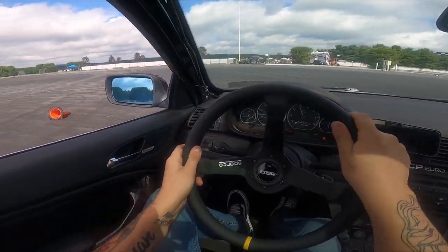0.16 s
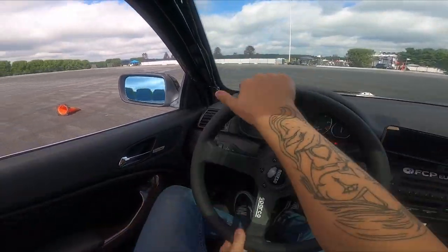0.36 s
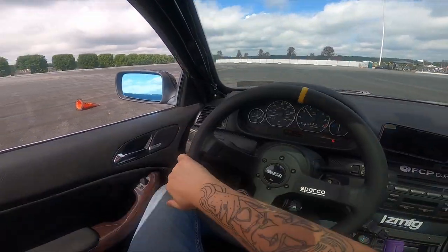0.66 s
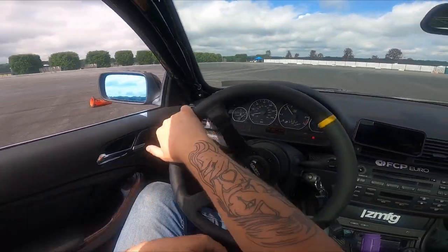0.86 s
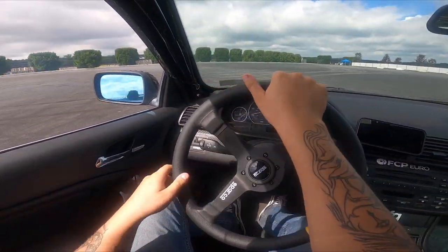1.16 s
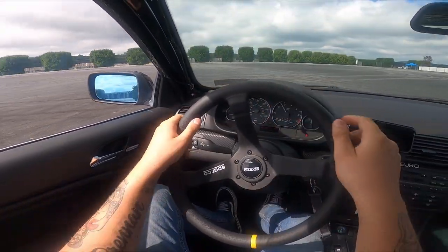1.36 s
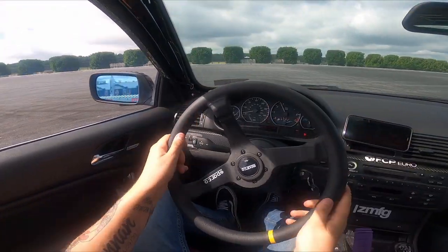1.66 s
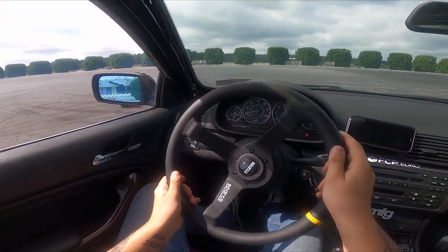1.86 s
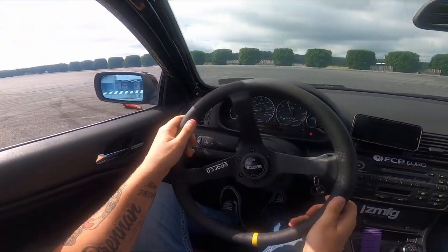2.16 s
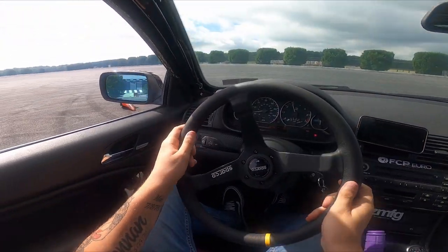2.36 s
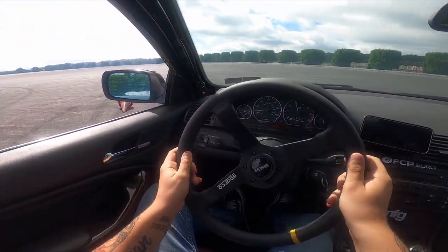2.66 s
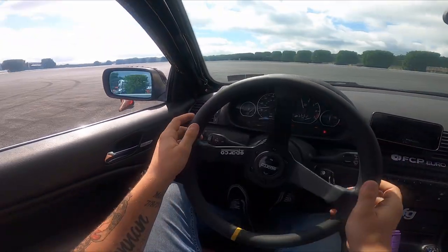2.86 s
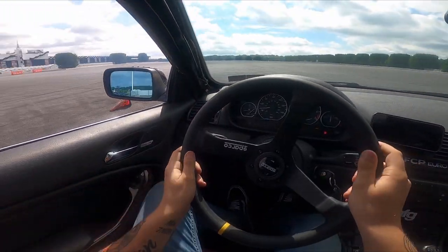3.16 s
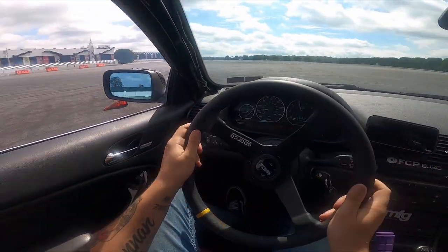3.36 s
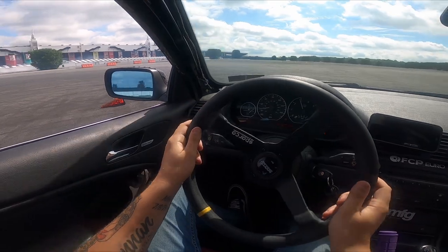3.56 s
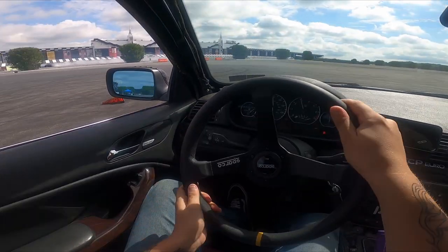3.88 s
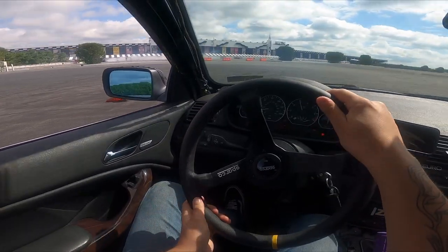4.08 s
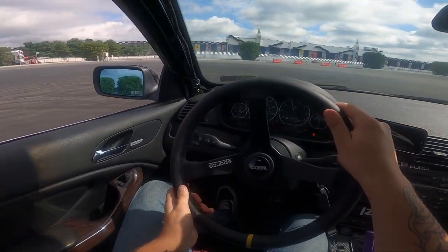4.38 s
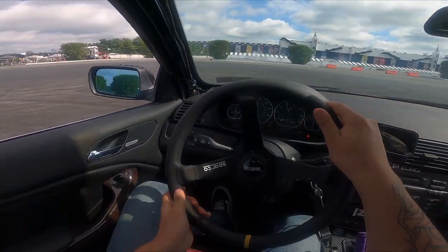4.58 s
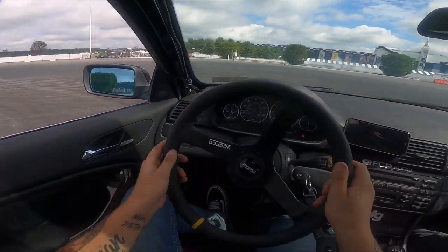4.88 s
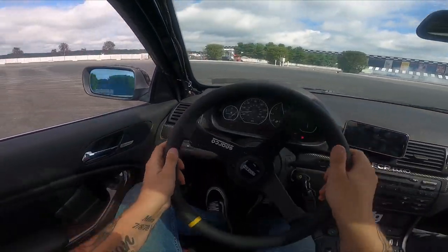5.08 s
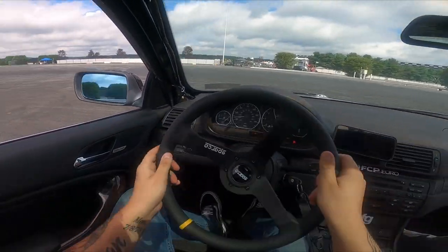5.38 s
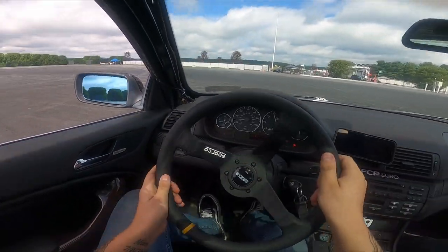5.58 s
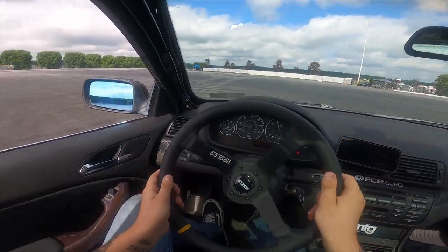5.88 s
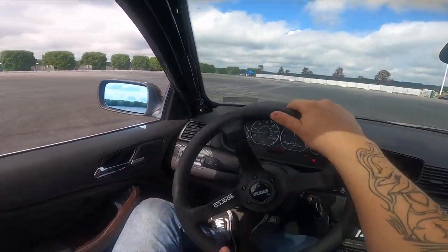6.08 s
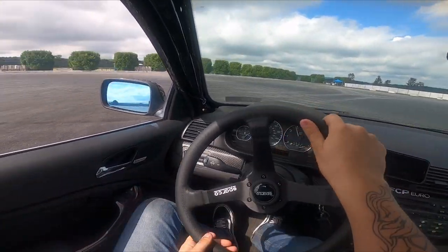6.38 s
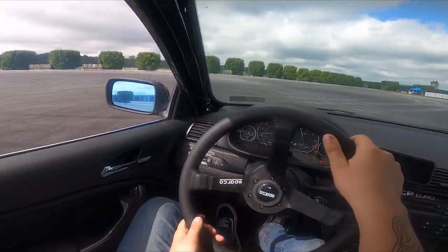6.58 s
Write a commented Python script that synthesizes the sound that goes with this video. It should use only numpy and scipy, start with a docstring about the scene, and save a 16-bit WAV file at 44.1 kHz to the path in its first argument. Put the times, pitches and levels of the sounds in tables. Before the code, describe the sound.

Inside a car drifting in tight circles on open tarmac, heard close at the driver's head. The engine is a deep, droning boom, already high at 0 s; it bogs sharply from 0.25 to 0.5 s, then climbs steadily to its peak near 3 s, drops briefly at 3.3 s, recovers by 4 s and wavers gently to the end at 6.7 s. Over it the tyres squeal without stopping, a warbling, grainy tone near 1.2 kHz with weak overtones and thin rubber hiss, sagging at 0.4 s and skipping momentarily near 0.6, 3.05, 3.9 and, most clearly, 5.9 s. Low body rumble rises around 0.6 s and again from 2.8 to 4.9 s. Wind buffets softly from 2.3 to 4 s, strongest at 3.25 s. Faint dry ticks are scattered throughout. The image is nearly mono, wider from about 0.7 to 3.7 s and slightly at the end; peaks are held down.

```python
"""The engine of a car drifting in tight circles on tarmac, heard from the driver's seat: it bogs
once, then booms at high revs, as harmonics of crank speed pass through the cabin's resonances.
The tyres squeal in stick-slip, as wandering tones rung by resonances, over a noise hiss of scrubbed
rubber. Banded noise makes the body's rumble and road sound, shaped noise the buffets of wind, and
impulses the faint ticks. A fast limiter holds down the peaks."""
import sys
import numpy as np
from scipy import signal
from scipy.fft import rfft, irfft
from scipy.io import wavfile
from scipy.ndimage import uniform_filter1d, minimum_filter1d

SR = 44100
rng = np.random.default_rng(int(sys.argv[2]) if len(sys.argv) > 2 else 0)


def store_wav(level_fs):
    """Save 16-bit WAV to argv[1]."""
    pcm = np.round(np.clip(np.atleast_2d(level_fs), -1, 1) * 32767)
    wavfile.write(sys.argv[1], SR, pcm.T.astype(np.int16))


N = 296793

# crankshaft speed: the bog, a climb, then a feathered throttle: time_s, speed_turns_per_s
CRANK_SPEED = [(0, 72), (.15, 71.6), (.27, 67), (.36, 57.6), (.52, 56.7), (.95, 61.6), (1.3, 64.1),
               (1.6, 68.3), (2.07, 70.9), (2.5, 74), (3.0, 76.5), (3.15, 75.9), (3.35, 69.7), (3.8, 73.4),
               (4.2, 74.4), (4.35, 72.2), (4.6, 71.9), (4.82, 73.8), (5.1, 74.6), (5.45, 72.3),
               (5.62, 69.8), (5.95, 71.3), (6.33, 69.9), (6.5, 71.5), (6.73, 72.2)]
# engine orders: multiple_of_crank_speed, relative_level_db
ENGINE_ORDERS = [(1, -29.5), (2, -25), (2.5, -43), (3, -31), (3.5, -46.5), (4, -32.5), (4.5, -59), (5, -48),
                 (6, -52.5), (7, -53), (8, -57.5), (9, -62.5)]
# the cabin booms and cancels as the orders sweep through it: frequency_hz, gain_db
CABIN_RESPONSE = [(70, -1.1), (76, 3.5), (112, -3.5), (120, -0.2), (140, 0.57), (152, -6.5), (175, -20.5),
                  (196, -7), (217, -0.1), (245, -15), (263, -24.5), (280, -2), (298, 1.5), (320, -9),
                  (349, -10.5), (362, 1), (380, -1), (400, -10.5), (418, -7), (432, 0), (470, -5),
                  (520, -5)]
RASP_DB_PER_HZ = 0.66  # half orders and the highest orders fade as the crank slows from top speed

# the tyres' squeal, sagging when the engine bogs: time_s, centre_pitch_hz, relative_level_db
SQUEAL_COURSE = [(0, 1177, -27), (.24, 1184, -28), (.39, 1063, -27), (.47, 1072, -29.5), (.55, 1166, -28),
                 (1.05, 1170, -27.5), (1.27, 1128, -26), (1.38, 1170, -26.5), (2.03, 1216, -27.5),
                 (2.92, 1172, -28), (3.3, 1155, -27), (3.8, 1200, -26.5), (4.85, 1201, -25.5),
                 (5.65, 1168, -27.8), (6.35, 1203, -26.3), (6.73, 1189, -27.5)]
# how hard the tread slides: time_s, relative_overtone_db, relative_scrub_hiss_db
TREAD_SLIDE = [(0, -46.5, -68), (.4, -45, -69), (1.1, -41.5, -65.5), (1.3, -43, -70.5), (2.05, -39.5, -67),
               (2.95, -41, -64), (3.27, -41, -60.5), (3.5, -43, -66.5), (3.9, -44.5, -67),
               (4.75, -45.5, -67), (5.7, -45, -67.5), (6.05, -47, -69), (6.6, -42.5, -68.5)]
# resonances that colour the squeal and its two overtones: centre_hz, width_hz, relative_gain_db
SQUEAL_MODES = [(1049, 29, -2), (1114.4, 42, -5), (1173.2, 26, 1), (1248.5, 30, 0), (1440, 150, -6)]
SECOND_OVERTONE_MODES = [(1880, 170, -2), (2147, 100, 2), (2349, 190, -0.5)]
THIRD_OVERTONE_MODES = [(2990, 310, -5), (3190, 340, 1), (3490, 240, 1), (4260, 1100, -6.5)]
# spectrum of the rubber's scrub: frequency_hz, relative_density_db_per_hz
SCRUB_SPECTRUM = [(2000, -7), (3400, 14), (4200, 10), (5200, -15.5), (6500, -22.5), (8500, -20),
                  (11000, -20.5), (16000, -30.5)]
# the squeal skips briefly: centre_s, depth_db
SQUEAL_SKIPS = [(.585, 4.5), (3.045, 5), (3.9, 4), (5.882, 10)]
SKIP_S = 0.015  # from the centre of a skip to 1/e of its depth in dB
GRIP_WANDER, GRIP_PER_S = .02, 9.0  # the leading tone warbles with grip: rms share of pitch, rate
GRIP_SWELL_DB = 0.75  # rms swell of the whole squeal
WINDOW_PAN_DB = 4  # left over right, for overtones and scrub; the squeal leans less

# body shake: time_s, shake_strength_db
BODY_SHAKE = [(0, -42), (.26, -42.5), (.6, -33), (1.7, -46), (2.8, -31.5), (3.25, -34), (3.7, -29),
              (4.4, -35), (4.85, -32), (6.7, -47.5)]
# spectra of the shell's rumble and the road: frequency_hz, relative_density_db_per_hz
RUMBLE_SPECTRUM = [(15, -11), (30, -3.5), (45, 3.5), (70, -5.5), (110, -5.5), (170, -7.5), (260, -15),
                   (400, -24), (700, -49.5)]
ROAD_SPECTRUM = [(150, -8.5), (300, 1.5), (450, -4), (600, -10), (750, -9), (1000, 5), (1300, 8),
                 (1630, -21), (2050, -2.5), (2580, -14), (3250, -22), (4500, -41.5)]
# the clearest ticks: start_s, relative_peak_db
CLEAR_TICKS = [(0.7067, -48), (0.9075, -48), (1.6256, -45), (4.2936, -48), (4.3273, -45), (4.5437, -45),
               (6.2458, -46), (6.3292, -47)]
# wind through the side window, its own at each microphone port: time_s, relative_level_db
WIND_COURSE = [(0, -80), (2.3, -49.5), (3.25, -40), (3.7, -50.5), (4.1, -77)]
# spectrum of the buffeting: frequency_hz, relative_gain_db
BUFFET_SPECTRUM = [(20, -1.5), (60, 2), (150, -8), (290, -6), (380, -14), (750, -21.5)]

# diffuseness of the sound field: frequency_hz, side_against_mid_db
FIELD_DIFFUSENESS = [(30, -38), (500, -26.5), (1200, -19.5), (2300, -6), (3500, -0.5), (5000, -1.5),
                     (8000, -8)]
# the stereo image opens from about 0.7 to 3.7 s and again at the end, and is nearly mono elsewhere:
# time_s, side_gain_db
IMAGE_WIDTH = [(.45, -63), (.7, -13.5), (1.9, -1), (3.4, 1), (4.4, -52.5), (6.2, -60), (6.4, -25),
               (6.73, -8.5)]
CUTOFF_HZ = 15800


def from_db(db):
    """Logarithmic level: decibels become an amplitude ratio."""
    return 10 ** (np.asarray(db) / 20)


def rms_one(x):
    """Power normalisation: unit mean square, taken in the middle of a stereo pair."""
    mid = np.atleast_2d(x).mean(axis=0)
    return x / np.sqrt(np.mean(mid ** 2) + 1e-20)


def in_time(rows):
    """Linear interpolation: each column of a time curve at every sample."""
    time_s, *columns = np.transpose(rows)
    return [np.interp(np.arange(N) / SR, time_s, column) for column in columns]


def at_hz(points, hz):
    """Logarithmic frequency scale: a spectrum is read between its points."""
    points_hz, points_db = np.array(points).T
    return np.interp(np.log(hz), np.log(points_hz), points_db)


def drift(rate_hz):
    """Low-pass noise: smooth random motion of rms 1, changing about `rate_hz` times a second."""
    step = 20  # samples between drawn points
    pole = np.exp(-2 * np.pi * rate_hz * step / SR)
    white = rng.standard_normal(N // step + 4002)
    slow = signal.lfilter([1], [1, -2 * pole, pole * pole], white)[4000:]  # past the filter's start
    return np.interp(np.arange(N) / step, np.arange(len(slow)), rms_one(slow))


def phase_of(hz):
    """Phase accumulation: the running integral of a moving frequency, in radians."""
    return 2 * np.pi * np.cumsum(hz) / SR


def resonance(x, hz, width_hz):
    """Damped resonator: a pole pair whose radius sets the bandwidth, gain about 1 at its peak."""
    radius = np.exp(-np.pi * width_hz / SR)
    feedback = [1, -2 * radius * np.cos(2 * np.pi * hz / SR), radius * radius]
    return signal.lfilter(np.array([1, 0, -1]) * (1 - radius * radius) / 2, feedback, x)


def spread(mid, side, hz):
    """Interaural decorrelation: unrelated signals form a stereo pair, more diffuse in the treble."""
    return mid + from_db(at_hz(FIELD_DIFFUSENESS, hz)) * side * np.array([[1], [-1]])


def banded_noise(spectrum, patchy_db):
    """Band-filtered noise: third-octaves that each flicker on their own, in stereo; rms 1."""
    white = rng.standard_normal((2, 2, N))
    total = 0
    for k, hz in enumerate(16 * 2 ** (np.arange(31) / 3)):
        if spectrum[0][0] <= hz <= spectrum[-1][0]:
            edges = hz * 2 ** (np.array([-1, 1]) / 6)
            band = signal.butter(2, edges, "band", fs=SR, output="sos")
            mid, side = signal.sosfilt(band, white[k % 2])  # neighbouring bands are unrelated
            level_db = at_hz(spectrum, hz) + patchy_db * drift(14)
            total = total + from_db(level_db) * spread(mid, side, hz)
    return rms_one(total)


def engine(unsteady=0.00077, rough=0.028, upper_rough=0.15, shake_rough=0.048):
    """Harmonic synthesis: orders line up into a lopsided suction pulse per turn; cabin modes colour it.

    Uneven firing roughens the orders; all roughness settings are rms shares."""
    skew = np.pi / 8  # radians
    speed, = in_time(CRANK_SPEED)
    crank = phase_of(speed * (1 + unsteady * drift(20)))
    shake_db, = in_time(BODY_SHAKE)
    shaken = shake_rough * from_db(shake_db - np.max(BODY_SHAKE, axis=0)[1])
    total = 0
    for order, level_db in ENGINE_ORDERS:  # half orders: a four-stroke repeats every second turn
        booms = order in (1, 2, 3, 4)
        rasps = order % 1 > 0 or order > 6
        rasp_db = rasps * RASP_DB_PER_HZ * (speed - speed.max())
        gain = from_db(level_db + at_hz(CABIN_RESPONSE, order * speed) + rasp_db)
        flutter = (rough if booms else upper_rough) + shaken  # a shaking body unsettles the orders
        lead = skew * (order != 2)  # the second order, the main boom, sets the beat
        total = total - gain * (1 + flutter * drift(16)) * np.cos(order * crank + lead)
    return np.sqrt(2) * total


def stick_slip(hz, wander, wander_rate, jitter, flutter_db):
    """Stick-slip: one patch's tone wanders with the grip and jitters on the road grain; rms 1."""
    pitch = hz * (1 + wander * drift(wander_rate) + jitter * drift(160.9))
    return rms_one(from_db(flutter_db * drift(42)) * np.sin(phase_of(pitch)))


def tread(hz, wander, jitter, count):
    """Superposition: several patches squeal at once, with unrelated mid and side parts; rms 1."""
    mid, side = [sum(stick_slip(hz, wander, 16, jitter, 3.2) for _ in range(count)) for _ in range(2)]
    return rms_one(spread(mid, side, np.mean(hz)))


def rung(x, modes):
    """Modal resonance: a signal passes through parallel modes of alternating sign; rms 1."""
    total = 0
    for k, (hz, width_hz, gain_db) in enumerate(modes):
        total = total + (-1) ** k * from_db(gain_db) * resonance(x, hz, width_hz)
    return rms_one(total)


def evened(x, share, window_s):
    """Steady friction power: feeding the patches evenly, it makes their sum swell less than chance."""
    smoother = signal.butter(1, 1 / (2 * np.pi * window_s), fs=SR)
    power = signal.filtfilt(*smoother, np.mean(x ** 2, axis=0), padtype="even")
    return rms_one(x / (np.abs(power) + 1e-9) ** (share / 2))


def skips():
    """Interrupted excitation: bell-shaped losses in dB while the squeal falters."""
    t = np.arange(N) / SR
    return sum(depth_db * np.exp(-((t - s) / SKIP_S) ** 2) for s, depth_db in SQUEAL_SKIPS)


def tyres():
    """Self-excited friction: a leading tone, a chorus of patches ringing the tyres, and overtones."""
    centre_hz, squeal_db = in_time(SQUEAL_COURSE)
    overtone_db, scrub_db = in_time(TREAD_SLIDE)
    lead_hz = centre_hz * (1 + GRIP_WANDER * drift(GRIP_PER_S))
    squeal_db = squeal_db + GRIP_SWELL_DB * drift(20) - skips()

    lead = stick_slip(lead_hz, wander=.007, wander_rate=38.5, jitter=0.01009, flutter_db=2.0)
    patches = tread(centre_hz, wander=.05, jitter=.04, count=4)
    chorus = from_db(1.5) * rung(patches, SQUEAL_MODES)
    squeal = from_db(squeal_db - 0.83) * evened(lead + chorus, share=0.64, window_s=0.0058)
    # every other slip is slightly stronger, which leaves a faint tone an octave down
    octave_down = stick_slip(centre_hz / 2, wander=.012, wander_rate=20, jitter=.015, flutter_db=6.5)
    undertone = from_db(squeal_db - 35) * octave_down

    second_patches = tread(lead_hz * 1.96, wander=.04, jitter=.04, count=5)
    second = from_db(overtone_db - 1.8) * rung(second_patches, SECOND_OVERTONE_MODES)
    third_patches = tread(lead_hz * 2.9, wander=.04, jitter=.04, count=4)
    third_db = .5 * (overtone_db + scrub_db) - 3.5
    third = from_db(third_db) * rung(third_patches, THIRD_OVERTONE_MODES)
    scrub = from_db(scrub_db + 1.0) * banded_noise(SCRUB_SPECTRUM, patchy_db=3.0)

    lean_db = WINDOW_PAN_DB * np.array([[.5], [-.5]])
    return (squeal + undertone) * from_db(0.77 * lean_db) + (second + third + scrub) * from_db(lean_db)


def body():
    """Structure-borne sound: the shaken shell rumbles and lets in the road, louder with harder scrub."""
    shake_db, = in_time(BODY_SHAKE)
    scrub_db = in_time(TREAD_SLIDE)[-1]
    rumble = from_db(0.51 * shake_db - 16.0) * banded_noise(RUMBLE_SPECTRUM, patchy_db=3.5)
    road_db = -40 + 0.53 * (scrub_db - scrub_db.mean())
    return rumble + from_db(road_db) * banded_noise(ROAD_SPECTRUM, patchy_db=2.0)


def ticks(per_s=34.0, level_db=-51.0, spread_db=6.0, clear_db=7.0):
    """Impulse excitation: faint, dry ticks at random times, and a few clearer ones, high-passed."""
    strike = rng.random(N) < per_s / SR
    strength_db = level_db + spread_db * np.clip(rng.standard_normal(N), -2, 1.5)
    clicks = strike * from_db(strength_db)
    for start_s, peak_db in CLEAR_TICKS:
        clicks[round(start_s * SR)] += from_db(peak_db + clear_db)
    return signal.sosfilt(signal.butter(1, 1500, "high", fs=SR, output="sos"), clicks)


def wind():
    """Turbulent pressure: lumpy low noise, unrelated between the ports."""
    hz = np.fft.rfftfreq(N, 1 / SR) + 1  # kept above zero for the logarithm
    gain = from_db(at_hz(BUFFET_SPECTRUM, hz)) / (1 + (hz / BUFFET_SPECTRUM[-1][0]) ** 4)
    ports = [rms_one(irfft(rfft(rng.standard_normal(N)) * gain, N)) for _ in range(2)]
    return from_db(in_time(WIND_COURSE)[0] + 2.4 * drift(4.8)) * np.array(ports)


def scene():
    """Linear superposition: engine, tyres, body, ticks and wind meet at the driver's head."""
    return from_db(-0.67) * engine() + tyres() + body() + ticks() + wind()


def limiter(x, ceiling_db=-12.0, release_db_per_s=42.0):
    """Peak limiting: the gain ducks just ahead of each peak over the ceiling and creeps back."""
    over_db = np.maximum(20 * np.log10(np.abs(x).max(axis=0) + 1e-9) - ceiling_db, 0)
    release_db = release_db_per_s * np.arange(N) / SR
    needed_db = release_db - np.maximum.accumulate(over_db + release_db)
    gain_db = minimum_filter1d(needed_db, size=128)  # samples; looks ahead of the peak
    return x * from_db(uniform_filter1d(gain_db, size=128))


def record(dry):
    """Mid-side scaling, limiting and low-pass: image narrows and opens, peaks are held, top is cut."""
    mid = dry.mean(axis=0)
    image = mid + from_db(in_time(IMAGE_WIDTH)[0]) * (dry - mid)
    fade_in = np.sin(np.pi / 2 * np.minimum(np.arange(N) / (.006 * SR), 1)) ** 2
    held = limiter(from_db(.5) * image * fade_in)
    return signal.sosfilt(signal.ellip(10, .1, 80, CUTOFF_HZ, fs=SR, output="sos"), held)


dry = scene()
out = record(dry)
store_wav(out)
```